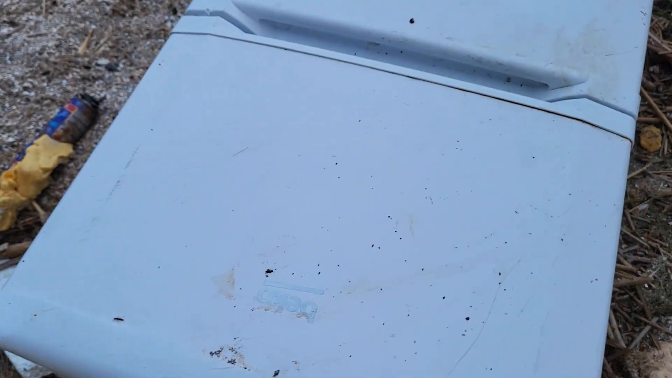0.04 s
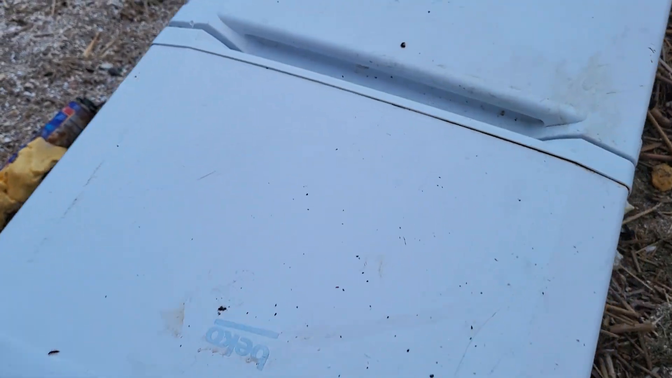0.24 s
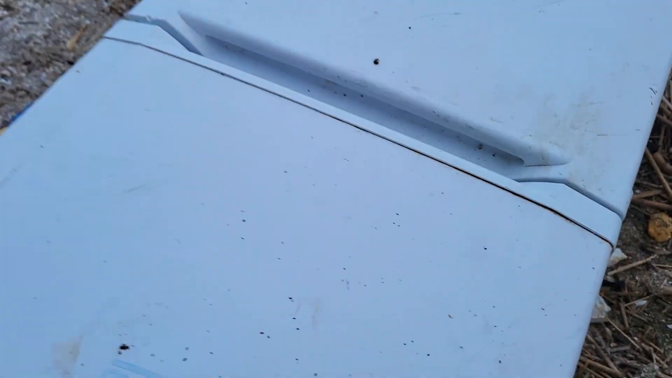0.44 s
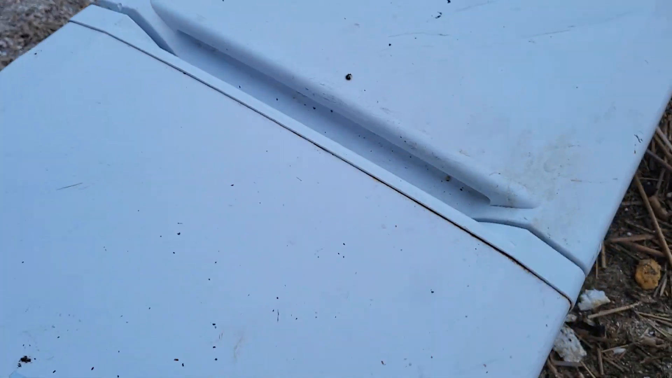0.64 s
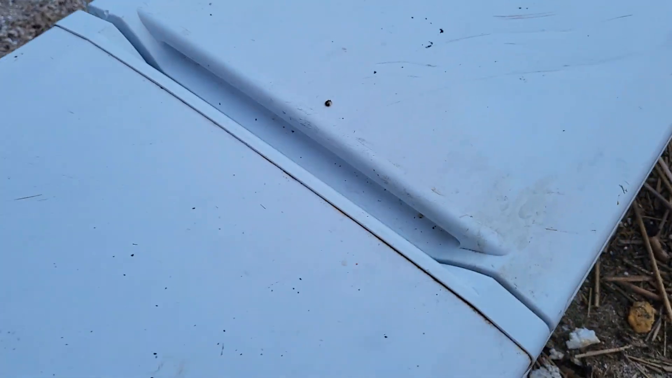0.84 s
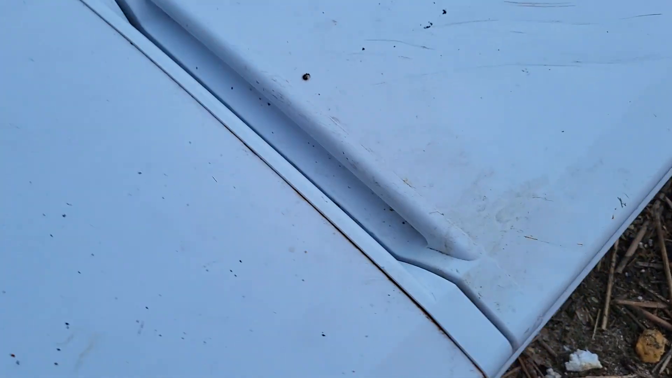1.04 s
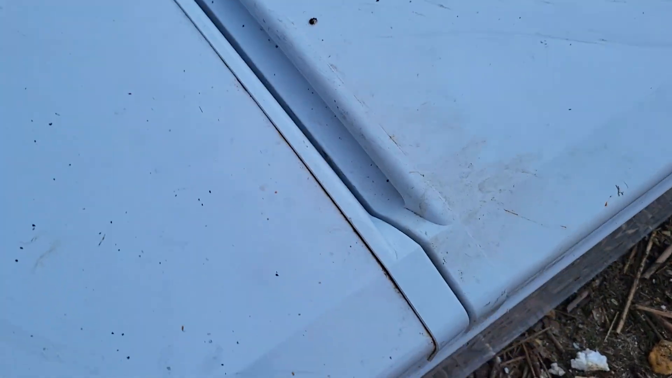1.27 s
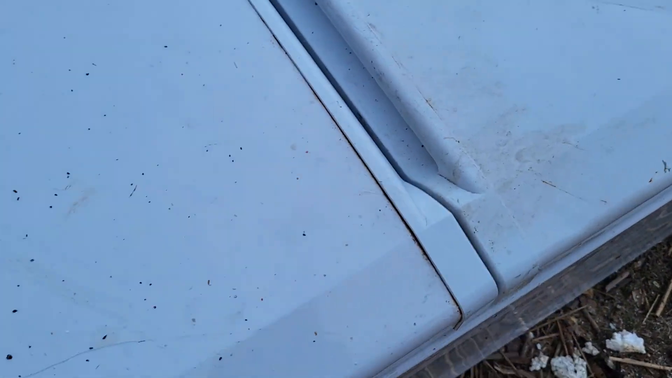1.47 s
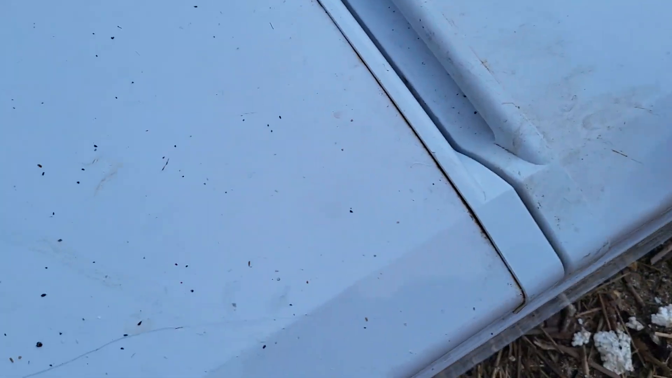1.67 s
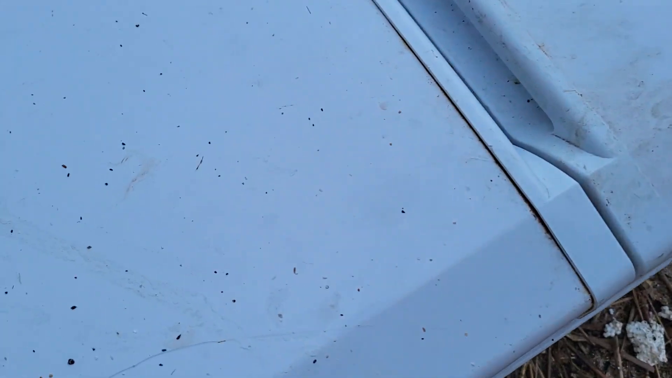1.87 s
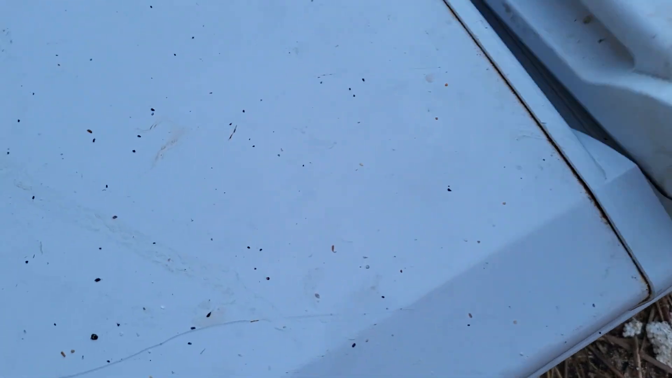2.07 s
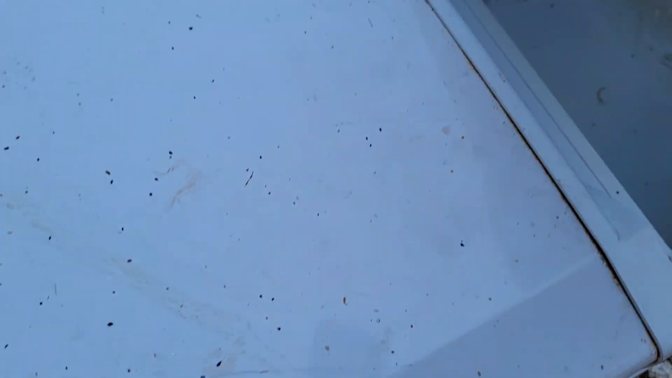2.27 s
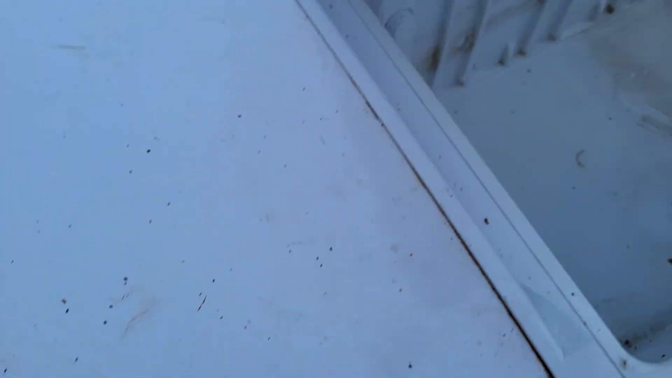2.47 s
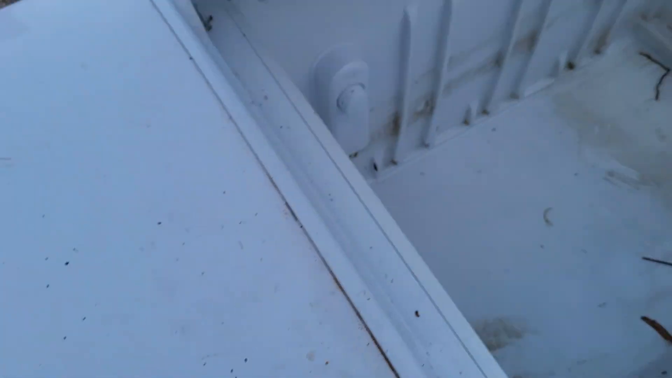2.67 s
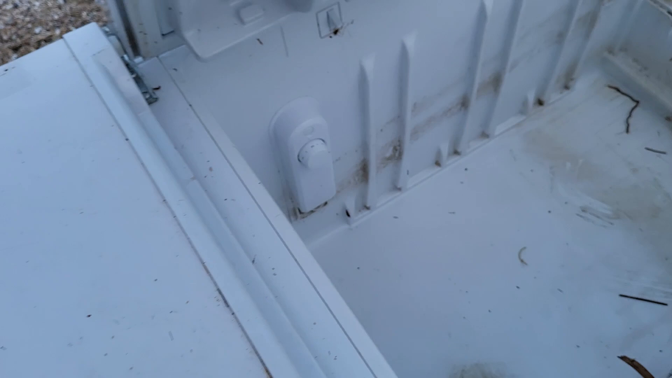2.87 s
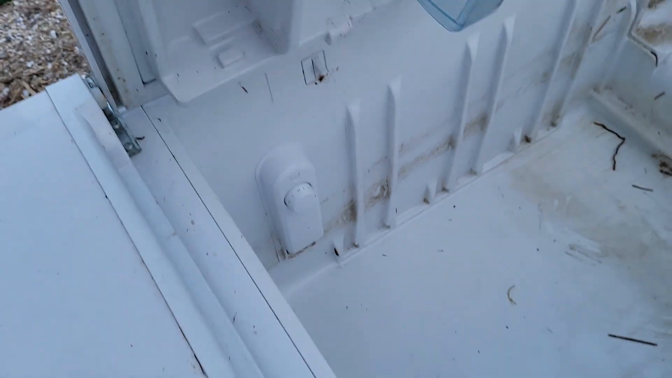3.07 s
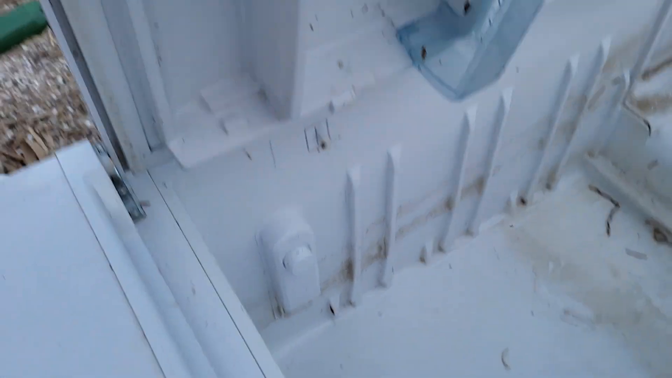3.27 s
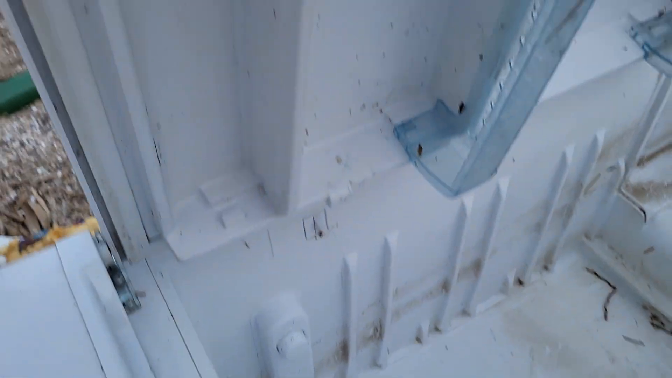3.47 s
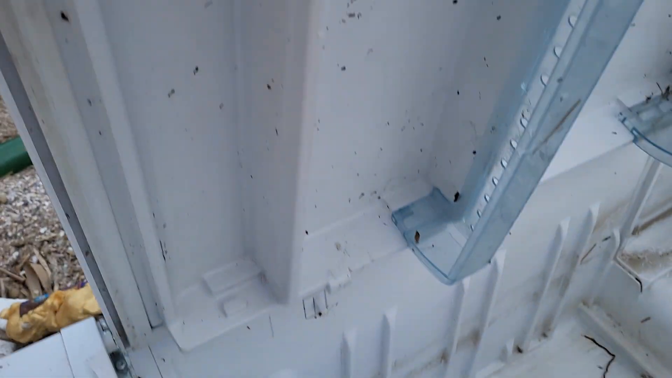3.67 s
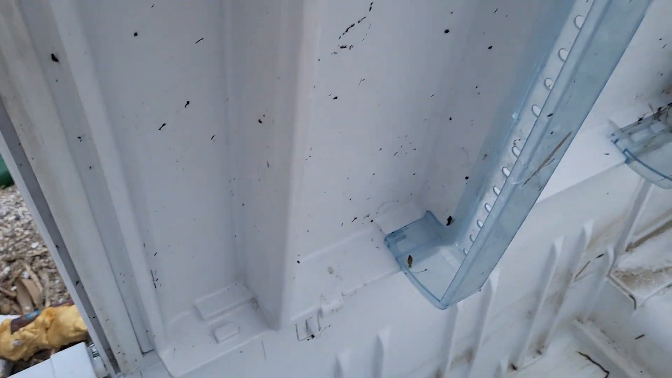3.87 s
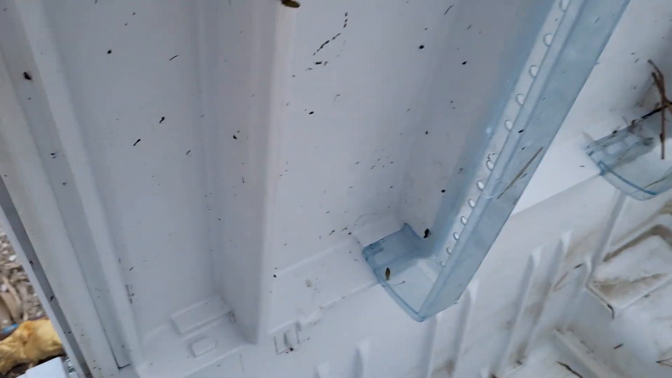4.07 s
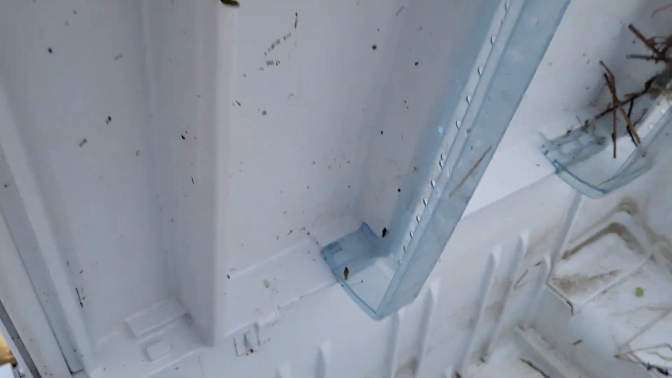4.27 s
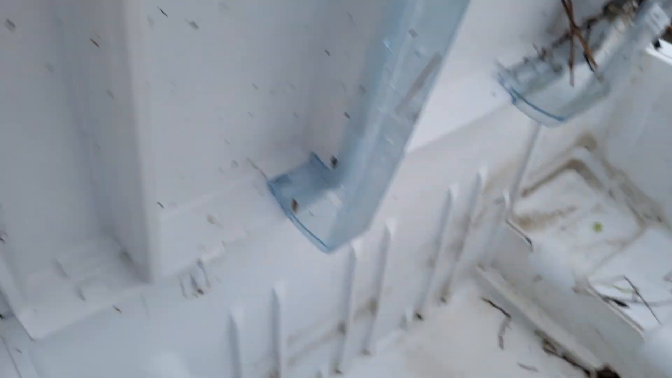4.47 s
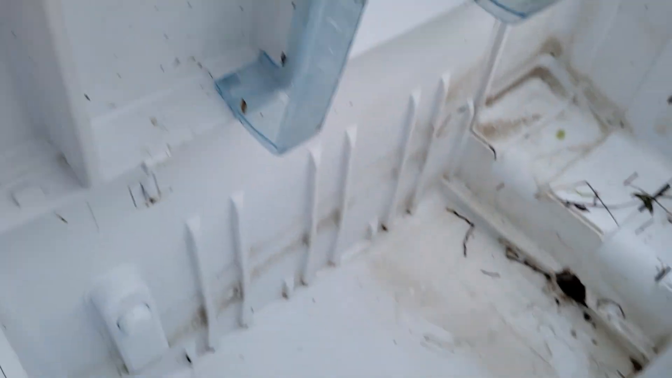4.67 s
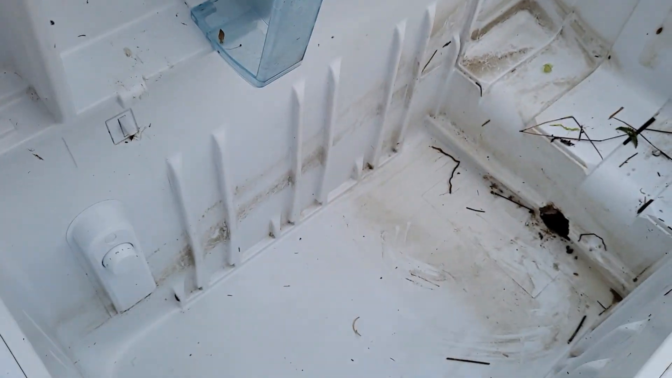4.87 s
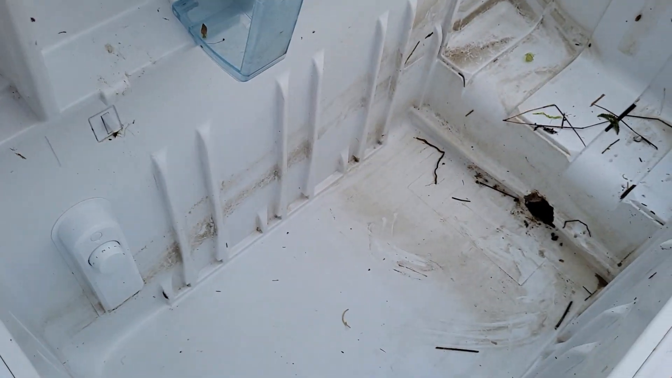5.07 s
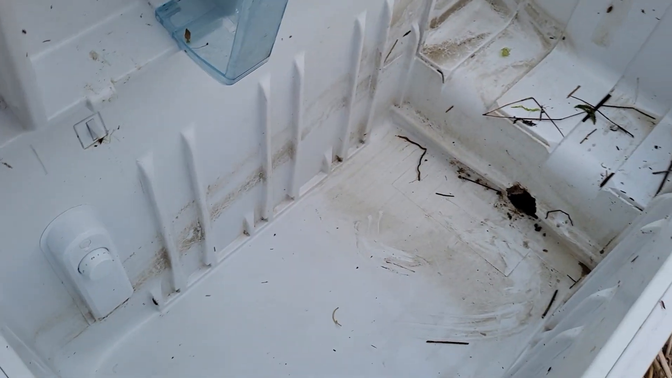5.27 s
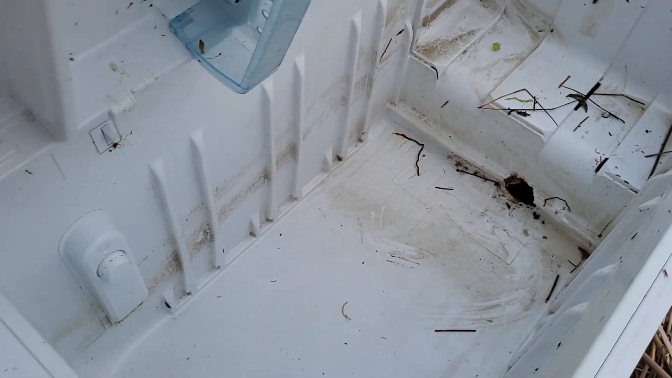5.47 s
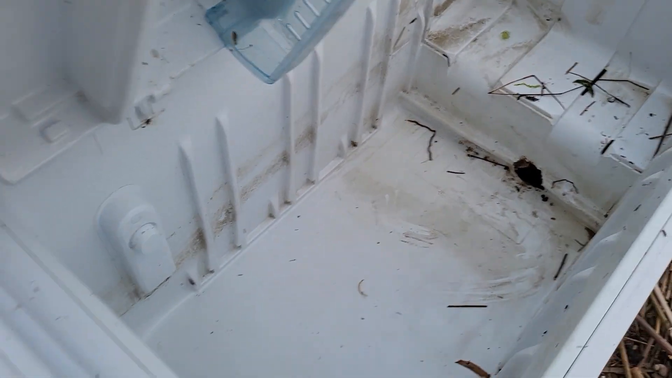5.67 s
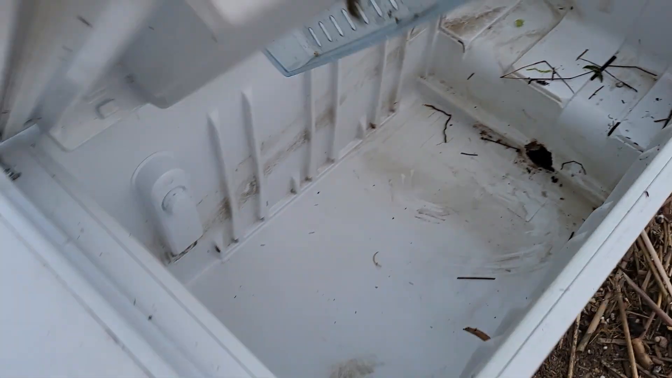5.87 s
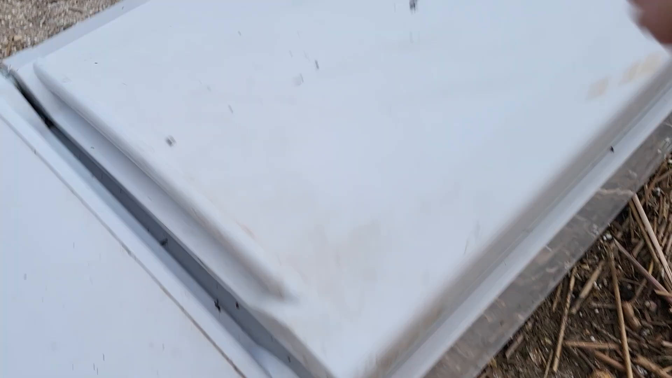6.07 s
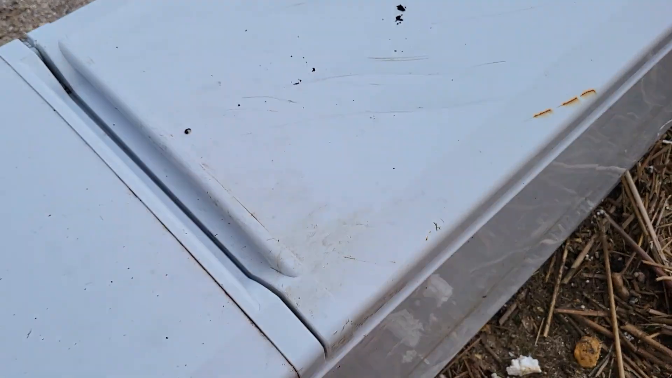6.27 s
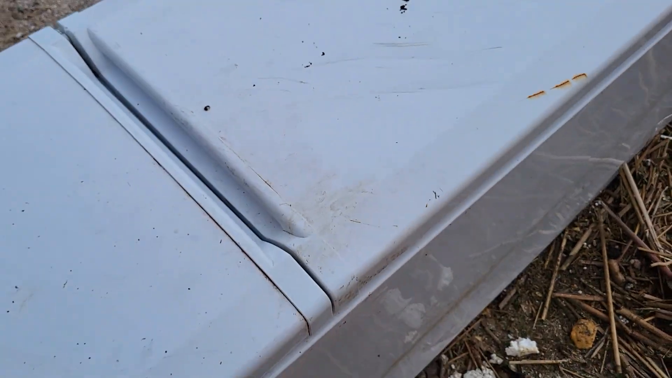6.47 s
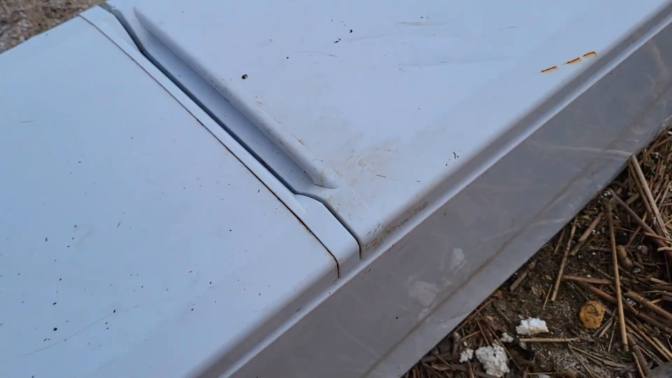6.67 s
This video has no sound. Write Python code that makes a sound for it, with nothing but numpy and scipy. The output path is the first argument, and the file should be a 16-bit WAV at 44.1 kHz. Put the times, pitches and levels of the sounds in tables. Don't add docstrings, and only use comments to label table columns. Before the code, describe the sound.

Feet crunch dry twigs and gravel outdoors, a hollow plastic door is pulled open with low wobbling thumps, then drops shut with a loud rattling slam.

```python
import sys
import numpy as np
from scipy import signal
from scipy.fft import rfft, irfft
from scipy.io import wavfile
from scipy.ndimage import uniform_filter1d

SR = 44100
rng = np.random.default_rng(int(sys.argv[2]) if len(sys.argv) > 2 else 0)


def inscribe(sig):
    pcm = np.round(np.clip(np.atleast_2d(sig).T, -1, 1) * 32767)
    wavfile.write(sys.argv[1], SR, pcm.astype(np.int16))


def decibels_to_gain(level_db):
    exponent = np.asarray(level_db, float) / 20
    return 10 ** exponent


N = 296352
T = np.arange(N) / SR
PORT_LAG = 12

# (time [s], level [dB])
WASH_LEVEL = [(0, -113), (.49, -74), (.7, -89), (1.14, -62.5), (1.5, -70), (1.7, -63.5), (2.19, -59),
              (2.44, -65.5), (2.8, -74), (3.64, -62.5), (4.08, -70), (4.47, -66.5), (5.33, -72),
              (5.96, -68), (6.1, -54.5), (6.42, -81.5), (6.72, -74)]
# (frequency [Hz], level [dB per Hz])
WASH_TONE = [(24, -72.5), (40, -5), (133, -1.5), (243, -4.5), (305, -21.5), (363, -11), (585, -3.5),
             (852, -7.5), (1900, -10.5), (8130, -21), (16000, -33)]
WASH_BALANCE_DB = 3.5
# (time [s], level [dB])
DRONE_LEVEL = [
    (0, -73),
    (.1, -73.5),
    (.35, -81.5),
    (.45, -86.5),
    (6.3, -90.5),
    (6.5, -65),
    (6.72, -76.5),
]
DRONE_HZ = [275, 337]
# (time [s], length [s], start pitch [Hz], end pitch [Hz], level [dB])
CHIRPS = [
    (4.95, 0.022, 4450, 4300, -65),
    (4.965, 0.019, 4400, 3400, -60),
    (5.145, 0.023, 4200, 3600, -68),
    (5.172, 0.022, 4070, 3900, -65),
    (5.253, 0.066, 5750, 3500, -64),
    (5.235, 0.015, 4960, 4500, -77),
    (5.332, 0.017, 2300, 2200, -72),
]

# (time [s], level [dB], balance [dB])
RUSTLE = [(0, -70, -1), (.28, -81, -4.5), (.86, -89, 3), (1.06, -60.5, -7.5), (1.46, -61.5, -5),
          (1.52, -46.5, -5), (1.67, -46.5, -1), (1.9, -69, -2), (2.13, -59, -10.5), (2.45, -63, -5),
          (2.67, -72, -3), (3.29, -66, -4), (4.12, -76, -6), (5.3, -77.5, -4), (5.46, -64.5, -1),
          (5.86, -66, -5), (5.96, -53, -2), (6.11, -51.5, -6)]
# (time [s], level [dB])
RUSTLE_AFTER = [
    (6.3, -76.5),
    (6.48, -82),
    (6.5, -70),
    (6.545, -66),
    (6.58, -79),
    (6.61, -58.5),
    (6.64, -61.5),
    (6.66, -70),
    (6.68, -66.5),
    (6.72, -72),
]
# (frequency [Hz], level [dB per Hz])
GRIT_TONE = [(470, -2), (800, -1), (1590, -3.5), (2840, -0.5), (4460, -1.5), (5510, -4.5), (8230, 1.5),
             (11100, -6), (13800, 0.5), (16000, -4.5)]
DEBRIS_S = (6.12, 6.16, 6.252, 6.285)
DEBRIS_DB, DEBRIS_BALANCE_DB, DEBRIS_DULL = -42, -12, 0.68

# (time [s], effort [dB])
EFFORT = [(0, -88), (.85, -83.5), (1.42, -58), (1.66, -44.5), (1.92, -39), (2.07, -19.5), (2.23, -27.5),
          (2.58, -54), (3.19, -63), (3.3, -42.5), (3.6, -49), (3.75, -31), (3.95, -49), (4.12, -65),
          (5.05, -100), (5.27, -54), (5.88, -54), (6.1, -35.5)]
UPPER_DB, UPPER_SLOPE = -61, 0.41
SETTLE_S, SETTLE_T60_S = 6.3, 0.31
SETTLE_DB, SETTLE_UPPER_DB, REST_DB = -27, -27, -66
# (frequency [Hz], level [dB], 60 dB decay time [s])
PANEL = [(51.3, -3, 0.16), (89.5, 3, 0.17), (108, -0.5, 0.1), (151.3, -5, 0.083), (176.7, -4.5, 0.16),
         (230, -9, 0.13), (251.7, -6, 0.14)]
# (time [s], peak level [dB], pitch [Hz])
JERKS = [(0.369, -62, 77), (0.558, -56.5, 120), (1.681, -37.5, 79), (1.762, -36.5, 54.7),
         (1.955, -39.5, 173), (2.031, -26, 58.4), (2.119, -24.5, 72), (2.908, -45.5, 184.6),
         (3.085, -45.5, 60.1), (3.256, -46, 191), (3.278, -40, 98), (3.326, -38.5, 62),
         (3.547, -40.5, 69.5), (3.795, -39.5, 67), (3.93, -41, 52.6), (6.322, -30, 240), (3.388, -27, 58),
         (3.449, -31, 65), (3.489, -30.5, 85.5), (3.67, -35, 105), (3.716, -29.5, 66), (3.748, -40, 69),
         (3.86, -32.5, 49), (4.035, -41.5, 54.4), (5.218, -52, 108), (5.942, -43, 100), (6.269, -22, 72.4),
         (2.198, -46, 62), (2.29, -36.5, 66.4), (.03, -58, 59.3), (0.36, -68, 399), (3.853, -63, 525),
         (4.498, -51.5, 591), (5.748, -48, 114), (2.042, -33, 190), (2.075, -27, 62), (2.125, -33, 210),
         (2.16, -30, 70), (2.39, -40, 55), (3.19, -48, 55), (4.33, -56, 55), (4.9, -56, 55), (.17, -60, 60),
         (5.965, -42, 130)]
JERK_T60_S = 0.13
# (time [s], force [dB], contact time [ms])
LANDING = [
    (6.143, -21, 4),
    (6.157, -2, 0.42),
    (6.171, 0.5, 8.5),
    (6.182, -9.5, 2.6),
    (6.214, -10.5, 3.8),
]
SCRAPE_DB, SCRAPE_SLOPE, SCRAPE_PER_S = -72, 0.39, 400

# (time [s], peak level [dB], pitch [Hz], balance [dB])
STICKS = [(1.1842, -22.5, 1630, 2), (1.226, -25, 1540, 4), (1.229, -17.5, 1420, -1),
          (1.2387, -23.5, 3060, -1), (1.407, -35.5, 5260, -3), (1.644, -18, 780, -1.5),
          (1.527, -36.5, 700, 0), (1.555, -32.5, 520, 2), (1.585, -32.5, 560, 5), (1.947, -39.5, 960, -2),
          (2.116, -28.5, 900, -5), (2.199, -43, 1530, -3), (2.32, -43.5, 2020, 13), (3.708, -47, 1230, -10),
          (6.4984, -48.5, 1006, 1), (6.525, -50, 1266, 6.5)]
# (time [s], peak level [dB], pitch [Hz], balance [dB])
TWIGS = [(0.185, -43, 1540, -1), (1.078, -42.5, 4290, -3), (1.271, -10, 1440, 1), (1.498, -29, 4130, -7.5),
         (1.543, -32, 4630, -1.5), (1.5693, -25.5, 1600, -13), (1.743, -56, 953, -10),
         (1.783, -28, 1230, -3), (1.8874, -28, 1420, -3), (2.945, -37.5, 4900, -1),
         (2.995, -25.5, 2600, -0.5), (3.313, -39, 5130, -2), (3.808, -27, 2100, -2), (3.322, -32, 5500, -2),
         (3.418, -31, 4300, -5), (3.4226, -39, 2610, -5), (3.5845, -33.5, 4200, -5),
         (3.589, -35.5, 6000, -1), (3.812, -36.5, 6430, -4), (5.5385, -28.5, 1510, 0),
         (6.04, -32.5, 3800, -1), (1.408, -32.5, 1500, 2), (1.09, -44, 5000, -4), (1.14, -42, 6000, -4),
         (5.8083, -36, 3540, -4), (5.921, -35, 1500, -0.5), (5.9446, -26.5, 1540, 0),
         (6.0003, -44, 4780, 15), (6.1562, -3, 4300, -4),]
# (time [s], peak level [dB], balance [dB])
GRAVEL = [(.435, -48, -8), (0.447, -47, -10), (0.4835, -28, -11), (0.552, -45, -1), (0.786, -44.5, -2),
          (.925, -49, -9), (0.968, -42.5, -9), (0.5854, -36, -4), (0.7334, -43, -7), (0.837, -45.5, -7),
          (1.3473, -23.5, -9), (1.356, -25, -6), (1.371, -36, -5), (1.378, -40, -5), (1.31, -35, -5),
          (3.066, -49, -1), (3.256, -43, -3), (3.298, -36, -2), (1.3606, -21, -4), (1.923, -28, -14),
          (2.2845, -25.5, -5), (2.304, -35, -19), (2.373, -29.5, -13), (2.468, -37, -22), (2.6385, -43, -8),
          (2.658, -27, -3), (2.743, -42, -2), (3.111, -27.5, -1), (3.181, -29, -2), (3.282, -35, -5),
          (3.338, -35, 2), (3.647, -29, -3), (5.7586, -40, -4), (6.1444, -26, 6), (2.993, -32.5, -7),
          (6.7077, -36, -2)]
# (time [s], peak level [dB], pitch [Hz], balance [dB])
SPLINTERS = [(1.269, -12, 1460, -7), (1.6415, -13, 790, -5), (1.646, -5.5, 1790, -4.5),
             (1.652, -11, 2000, -6), (1.6567, -17.5, 900, 5), (1.6615, -22, 2170, -13),
             (3.4125, -25, 2240, 1), (.4655, -38, 3570, -4), (0.4726, -35, 4250, -4),
             (0.479, -28, 3650, -2.5), (0.5105, -51, 4000, -2)]
# (time [s], peak level [dB], pitch [Hz], balance [dB])
REEDS = [(3.3168, -29.5, 2750, -6), (3.4145, -29.5, 2100, 0), (3.584, -27.5, 2430, -10),
         (5.4357, -39.5, 4940, -3.5), (5.538, -29.5, 5000, -2.5), (5.6787, -43, 3560, -2.5),
         (5.817, -36, 3520, -2), (6.2135, -30, 5000, -4), (6.261, -29, 5200, -1), (1.597, -34, 7500, -3),
         (1.521, -45, 4700, -6), (6.6066, -41.5, 6100, 3), (6.4983, -49.5, 7160, -1.5),
         (6.5238, -61, 7300, 2), (6.538, -49, 7000, 2.5), (.2299, -54, 4600, -4), (.2778, -61, 4800, -3.5),
         (.3197, -58, 7500, -2), (.332, -64.5, 4050, 0), (2.3054, -35.5, 2360, -11), (2.312, -36, 6000, -2)]
# (time [s], peak level [dB], balance [dB])
STRAW = [(.0782, -42, -9), (.0992, -50, -7), (.1451, -61, 1), (.63, -51, -2), (.679, -52, 0),
         (.762, -45, -4), (.052, -54, -3), (.11, -54, -5), (.197, -52, -4), (1.2255, -25, -7),
         (1.2285, -22, -6), (1.24, -24, -11), (1.464, -46, -5), (1.647, -12, -14), (2.116, -24, -10),
         (1.627, -28, -5), (2.3453, -35, -5), (2.3932, -35, -5.5), (2.461, -44, -7), (2.472, -36, -7),
         (3.49, -27, -2), (5.9281, -23, -2), (5.9456, -27.5, -10), (6.0668, -35, -2.5), (6.239, -36, -5),
         (6.3601, -46, -5.5), (6.412, -54, -6.5), (6.436, -39.5, -4.5), (6.4634, -53, -4.5),
         (6.5642, -52, -3.5), (6.5896, -45, -1), (6.6, -48, -4), (6.6689, -42.5, -7)]
STICK_RING_DB, STICK_T60_S = -5, .02
TWIG_RING_DB, TWIG_T60_S = -16, .022
GRAVEL_RING_DB, GRAVEL_T60_S, GRAVEL_HZ = -51.5, .014, 3800
SPLINTER_RING_DB, SPLINTER_T60_S = -16.5, 0.0054
REED_RING_DB, REED_T60_S = -11.5, 0.017
STRAW_LOW_HZ, STRAW_T60_S = 6000, 0.0036
LOW_HZ, STICK_TOP_HZ, TWIG_TOP_HZ = 1300, 5200, 12000
BRIGHT_TOP_HZ = SR * .4
GIVE_S = .001
CREAK, CREAK_S = .016, .008
BREAK = 2.6
TILT = .5

# (time [s], peak level [dB], lowest frequency [Hz], balance [dB])
LINER = [(.053, -47.5, 450, 1), (0.365, -54.5, 330, 2), (.197, -58, 500, 1), (0.966, -50, 580, 7),
         (1.539, -37.5, 490, 3), (1.57, -35.5, 530, -1), (1.639, -29.5, 704, -2), (2.038, -33, 705, -3),
         (2.045, -26.5, 710, 0), (2.122, -26, 730, 0.5), (2.199, -32, 630, -2), (2.296, -39.5, 626, 1),
         (3.107, -57, 566, 11), (3.177, -48, 706, 3), (6.1156, -14, 1300, -2), (6.258, -26.5, 566, -4),
         (6.3, -36, 384, 3), (6.325, -39, 440, 1), (6.344, -39, 488, -2), (6.372, -47, 420, 3),
         (6.4, -52, 400, 3), (3.351, -47.5, 470, 2.5), (3.52, -50, 900, 0), (3.704, -58, 500, -2),
         (3.741, -51, 590, -8), (3.772, -50, 900, 0), (5.666, -56, 900, 2), (6.631, -49.5, 760, 4.5)]
# (time [s], peak level [dB], balance [dB])
SHELF = [
    (1.226, -40.5, 3),
    (3.854, -46, -2),
    (4.5, -47.5, 6),
]
# (time [s], peak level [dB], balance [dB])
SLAM = [
    (6.157, -10, -6),
    (6.166, -14.5, 6.5),
    (6.185, -19, -4),
    (6.2153, -16.5, -1),
    (6.233, -25, 3),
]
# (time [s], peak level [dB], balance [dB])
CLIPS = [(6.04, -32, 2), (6.142, -25, 1), (6.162, -26, -3), (6.176, -20, -4.5), (6.19, -22, -4),
         (6.2, -28, -6), (6.226, -29, -3), (6.245, -31, -0.5), (6.148, -33, 4), (6.2137, -23, 4),
         (6.263, -35, -4), (6.296, -37, 0), (6.321, -49, -6)]
LINER_TOP_HZ, LINER_T60_S = 1600, 0.19
SHELF_HZ, SHELF_TOP_HZ, SHELF_T60_S = 530, 600, 0.29
SLAM_HZ, SLAM_TOP_HZ, SLAM_T60_S = 900, 2220, 0.17
CLIP_HZ, CLIP_TOP_HZ, CLIP_T60_S = 1130, 5500, 0.017
APART = 0.45

# (frequency [Hz], level [dB], 60 dB decay time [s])
SKIN = [(353.7, -4.5, 0.17), (401, -8, 0.22), (515.5, 0, 0.14), (607.4, -6, 0.22), (824, -8.5, .15),
        (867, -8.5, 0.14), (1045, -6.5, 0.055), (1183, -3.5, 0.14), (1440, -4.5, 0.1), (1692, 3, 0.042),
        (1860, -3.5, .06), (2100, -8.5, 0.05), (2460, -6, 0.038), (2750, -27, 0.023)]
# (time [s], force [dB], contact time [ms])
STRIKES = [(6.116, -22, 0.11), (6.119, -30, 0.13), (6.1211, -36, 0.17), (6.126, -22.5, 0.11),
           (6.1564, -18, 0.21), (6.1654, -24, 0.45), (6.171, -15.5, 0.24), (6.176, -20.5, 0.42),
           (6.187, -26.5, 0.53), (6.195, -28.5, .2), (6.204, -27, .2), (6.2144, -16.5, .12),
           (6.219, -22, 0.27), (6.233, -27, 0.15), (6.24, -25.5, .2), (6.262, -37.5, 0.18),
           (6.294, -42, 0.37), (6.323, -42, 0.22)]


def unit(x):
    return x / np.sqrt(np.mean(x ** 2, axis=-1, keepdims=True))


def curves(table):
    times, *columns = np.transpose(table)
    return [np.interp(T, times, column) for column in columns]


def butter(x, order, hz, kind):
    return signal.sosfilt(signal.butter(order, hz, kind, fs=SR, output="sos"), x)


def colour(x, points, lo, hi):
    f = np.fft.rfftfreq(N, 1 / SR) + 1
    hz, db = np.transpose(points)
    gain = decibels_to_gain(np.interp(np.log(f), np.log(hz), db))
    band_power = np.sum(gain[(f > lo) & (f < hi)] ** 2) / len(f)
    return irfft(rfft(x) * gain / np.sqrt(band_power), N)


def walk(rate):
    k = int(SR / rate)
    steps = np.repeat(rng.standard_normal(N // k + 1), k)
    smooth = uniform_filter1d(uniform_filter1d(steps, k), k)
    return unit(smooth[:N])


def ring(x, modes, damping=0.):
    out = 0
    for hz, db, t60 in modes:
        r = 1000 ** (-1 / (t60 * (1 - damping) * SR))
        w = 2 * np.pi * hz / SR
        out = out + decibels_to_gain(db) * signal.lfilter([0, np.sin(w)], [1, -2 * r * np.cos(w), r * r], x)
    return out


def push(ms, size):
    k = max(int(ms * SR / 1000), 1)
    force = np.sin(np.pi * (np.arange(k) + .5) / k)
    return np.pad(force / force.sum(), (0, size - k))


def add(out, x, s, balance_db, lag=0):
    pair = np.broadcast_to(x, (2, x.shape[-1]))
    for ch, sign in enumerate((1, -1)):
        i = int(s * SR) + max(-sign * lag, 0)
        part = pair[ch, :max(N - i, 0)]
        out[ch, i:i + len(part)] += part * decibels_to_gain(sign * balance_db / 2)


def shore():
    mid, side = (colour(rng.standard_normal(N), WASH_TONE, lo=500, hi=1800) for _ in range(2))
    mid, side = butter(mid, 2, 110, "high"), butter(side, 2, 250, "high")
    balance_db = np.array([[1], [-1]]) * WASH_BALANCE_DB / 2
    level_db = curves(WASH_LEVEL)[0] + 1.1 * walk(8.9) + balance_db
    return decibels_to_gain(level_db) * (mid + np.outer([1, -1], side))


def drone():
    tones = 0
    for hz in DRONE_HZ:
        phase = 2 * np.pi * np.cumsum(hz * (1 + 0.0059 * walk(42))) / SR
        tones = tones + np.sin(phase)
    return decibels_to_gain(curves(DRONE_LEVEL)[0]) * tones


def rustle():
    level_db, balance_db = curves(RUSTLE)
    level_db = np.where(T > DEBRIS_S[2], curves(RUSTLE_AFTER)[0], level_db)
    shaken = np.interp(T, DEBRIS_S, [0, 1, 1, 0])
    level_db = level_db + shaken * (DEBRIS_DB - level_db)
    balance_db = balance_db + shaken * (DEBRIS_BALANCE_DB - balance_db)
    size_db = np.minimum(20.0 * rng.exponential(size=N), 12)
    grains = unit((rng.random(N) < .12) * rng.standard_normal(N) * decibels_to_gain(size_db))
    grains += (rng.random(N) < 60 / SR) * rng.uniform(-0.84, 1, N) * 9
    left = grains * (rng.random(N) < .5)
    right = grains - left
    pair = np.array([left + np.roll(right, PORT_LAG), right + np.roll(left, PORT_LAG // 2 + 1)])
    pair = colour(pair + .6 * rng.standard_normal((2, N)), GRIT_TONE, lo=3000, hi=15000)
    dull = 1.7 * butter(pair, 2, 6000, "low")
    pair = pair + DEBRIS_DULL * shaken * (dull - pair)
    unsteady_db = 1.2 * walk(40) + 3.5 * walk(150)
    return pair * decibels_to_gain(level_db + unsteady_db + np.array([balance_db, -balance_db]) / 2)


def handling():
    effort = curves(EFFORT)[0]
    upper = UPPER_DB + UPPER_SLOPE * (effort + 55)
    fade_db = -60 * np.abs(T - SETTLE_S) / np.where(T < SETTLE_S, .1, SETTLE_T60_S)
    shut = T > EFFORT[-1][0]
    shake_db = np.where(shut, np.maximum(SETTLE_DB + fade_db, REST_DB), effort)
    upper_db = np.where(shut, np.maximum(SETTLE_UPPER_DB + fade_db, REST_DB), upper)
    return shake_db, upper_db


def panel_wobble(shake_db, upper_db):
    hand = rng.standard_normal((3, N)) * decibels_to_gain(3.7 * walk(14))
    low = unit(ring(hand, [(44.2, -7.5, 0.11), (65.0, -3.5, 0.23), (98, -1.5, 0.084)]))
    upper = unit(ring(ring(hand[::-1], PANEL[2:], 0.79), [(210, 0, 0.0025)]))
    low_pair = low[0] + 0.3 * low[1:]
    upper_pair = upper[0] + 0.57 * upper[1:]
    return low_pair * decibels_to_gain(shake_db - 10.5) + upper_pair * decibels_to_gain(upper_db)


def scrape(shake_db):
    size_db = np.minimum(3.5 * rng.exponential(size=N), 8)
    grains = (rng.random((2, N)) < SCRAPE_PER_S / SR) * rng.standard_normal((2, N)) * decibels_to_gain(size_db)
    hinge = [(520, 1.5, 0.019), (773, 2.5, 0.018), (1150, -1, 0.016), (1800, -3, 0.009), (2300, -8.5, .009)]
    sound = unit(ring(grains[0] + 1.7 * grains, hinge))
    level_db = SCRAPE_DB + SCRAPE_SLOPE * (np.minimum(shake_db, -35) + 52) + 5.1 * walk(19)
    still_open = T < STRIKES[0][0]
    return sound * still_open * decibels_to_gain(level_db)


def jerks():
    out, t = np.zeros((2, N)), np.arange(16384) / SR
    envelope = (1 - np.exp(-t / 0.0122)) ** 2 * 1000 ** (-t / JERK_T60_S)
    for s, db, hz in JERKS:
        swing = envelope * np.sin(2 * np.pi * hz * t)
        add(out, decibels_to_gain(db - 3.5) * swing / np.abs(swing).max(), s - .006, -.8)
    return out


def snap_rows():
    rows = []
    for s, db, hz, pan in STICKS:
        rows.append((s, db, STICK_RING_DB, hz, STICK_T60_S, LOW_HZ, STICK_TOP_HZ, pan))
    for s, db, hz, pan in TWIGS:
        rows.append((s, db, TWIG_RING_DB, hz, TWIG_T60_S, LOW_HZ, TWIG_TOP_HZ, pan))
    for s, db, pan in GRAVEL:
        rows.append((s, db, GRAVEL_RING_DB, GRAVEL_HZ, GRAVEL_T60_S, 2 * LOW_HZ, BRIGHT_TOP_HZ, pan))
    for s, db, hz, pan in SPLINTERS:
        rows.append((s, db, SPLINTER_RING_DB, hz, SPLINTER_T60_S, LOW_HZ, BRIGHT_TOP_HZ, pan))
    for s, db, hz, pan in REEDS:
        rows.append((s, db, REED_RING_DB, hz, REED_T60_S, LOW_HZ, TWIG_TOP_HZ, pan))
    for s, db, pan in STRAW:
        rows.append((s, db, GRAVEL_RING_DB, GRAVEL_HZ, STRAW_T60_S, STRAW_LOW_HZ, BRIGHT_TOP_HZ, pan))
    return rows


def snaps():
    out, t = np.zeros((2, N)), np.arange(-1500, 4096) / SR
    before, after = np.minimum(t, 0), np.maximum(t, 0)
    straining = .4 * np.exp(before / GIVE_S) + CREAK * np.exp(before / CREAK_S)
    spiky = rng.standard_normal(N) * decibels_to_gain(np.minimum(3.5 * rng.exponential(size=N), 15))
    bright = butter(colour(unit(spiky), GRIT_TONE, lo=3000, hi=15000), 3, 1900, "high")
    for s, db, ring_db, hz, t60, low_hz, top_hz, balance_db in snap_rows():
        pick, side, size = rng.random(3)
        crumble = 0.076 * 1000 ** (-t / np.clip(t60, .003, .05))
        debris = 0.032 * 1000 ** (-t / 0.14)
        start = int(pick * (N - len(t)))
        burst = bright[start:start + len(t)] * np.where(t < 0, straining, crumble + debris)
        burst[1500:1503] += BREAK * 0.37 * np.array([1, -1.6, .7])
        wood_modes = [(hz, 0, .005), (0.62 * hz, -6, .006), (1.603 * hz, -7, .003)]
        wood = ring(burst * 1000 ** (-after / 0.09), wood_modes)
        burst = butter(burst, 3, [low_hz, top_hz], "band")
        burst = signal.lfilter([1, TILT * size - .5], 1, burst)
        sound = burst / np.abs(burst).max() + decibels_to_gain(ring_db + 8.5) * wood / np.abs(wood).max()
        lag = int(PORT_LAG * (.5 + side / 2) * np.sign(balance_db + side - .5))
        add(out, decibels_to_gain(db) * sound, s + t[0] + .0015, balance_db, lag)
    return out


def knock_rows():
    rows = [(s, db, hz, LINER_TOP_HZ, LINER_T60_S, pan) for s, db, hz, pan in LINER]
    rows += [(s, db, SHELF_HZ, SHELF_TOP_HZ, SHELF_T60_S, pan) for s, db, pan in SHELF]
    rows += [(s, db, SLAM_HZ, SLAM_TOP_HZ, SLAM_T60_S, pan) for s, db, pan in SLAM]
    rows += [(s, db, CLIP_HZ, CLIP_TOP_HZ, CLIP_T60_S, pan) for s, db, pan in CLIPS]
    return rows


def knocks():
    out, t = np.zeros((2, N)), np.arange(16384) / SR
    bands = 250 * 2 ** np.arange(0, 5, .5)
    rattle = rng.standard_normal(N) * decibels_to_gain(2.0 * walk(220))
    rattle = np.diff(rattle, prepend=0)
    noises = [unit(ring(ring(rattle, [(b, 0, 5 / b)]), [(b, 0, 5 / b)])) for b in bands]
    contact = (1 - np.exp(-t / .0004)) * (1 + 1.2 * np.exp(-t / .004))
    for s, db, hz, top_hz, t60, balance_db in knock_rows():
        pick = rng.integers(0, N - len(t))
        octaves = np.log2(bands / hz)
        band_db = 11 * np.minimum(octaves, 0) - 2.7 * np.maximum(octaves, 0)
        band_db = band_db - 11 * np.maximum(np.log2(bands / top_hz), 0)
        haste = 2 ** (.4 * octaves) / t60
        sound = np.zeros((2, len(t)))
        for noise, level_db, speed in zip(noises, band_db, haste):
            shared = noise[pick:pick + len(t)]
            differing = APART * noise[::-1][pick:pick + len(t)]
            sound += decibels_to_gain(level_db) * np.array([shared + differing, shared - differing]) * 1000 ** (-t * speed)
        sound = butter(sound * contact, 2, hz / 2, "high")
        add(out, decibels_to_gain(db) * sound / np.abs(sound).max(), s, balance_db, lag=4)
    return out


def chirps():
    out = np.zeros((2, N))
    for s, length, start_hz, end_hz, db in CHIRPS:
        u = np.linspace(0, 1, int(length * SR))
        flutter = np.maximum(0.72 + 0.68 * walk(215)[:len(u)], 0)
        pitch = start_hz + (end_hz - start_hz) * u + 190 * walk(400)[:len(u)]
        whistle = np.sin(2 * np.pi * np.cumsum(pitch) / SR)
        add(out, decibels_to_gain(db) * np.sin(np.pi * u) * flutter * whistle, s, 2.5)
    return out


def skin_strikes():
    out = np.zeros((2, N))
    for s, db, ms in STRIKES:
        place, *ports = rng.standard_normal((3, len(SKIN)))
        for ch, port in enumerate(ports):
            modes = [(hz * (1 + 0.0087 * p + 0.014 * q), level + 4 * p + 2.0 * q, t60)
                     for (hz, level, t60), p, q in zip(SKIN, place, port)]
            sound = decibels_to_gain(db - 11) * ring(push(ms, size=12000), modes)
            i = int(s * SR)
            out[ch, i:i + len(sound)] += sound
    return butter(out, 2, 300, "high")


def landing():
    force = np.zeros((2, N))
    for s, db, ms in LANDING:
        add(force, decibels_to_gain(db) * push(ms, size=512), s, -.9)
    shifted = [(hz + 2.7, db, t60) for hz, db, t60 in PANEL]
    return np.array([ring(force[0], PANEL), ring(force[1], shifted)]) * decibels_to_gain(-2.0)


def scene():
    shake_db, upper_db = handling()
    background = shore() + drone() + chirps()
    litter = rustle() + snaps()
    moving_door = panel_wobble(shake_db, upper_db) + scrape(shake_db) + jerks()
    return background + litter + moving_door + knocks() + skin_strikes() + landing()


def band_limit(x):
    return signal.sosfilt(signal.butter(12, 17000, fs=SR, output="sos"), x)


def record(dry):
    x = np.tanh(butter(dry, 4, 34, "high"))
    mix = signal.sosfilt(signal.ellip(6, .3, 45, 16000, fs=SR, output="sos"), x)
    return band_limit(mix)


dry = scene()
out = record(dry)
inscribe(out)
```